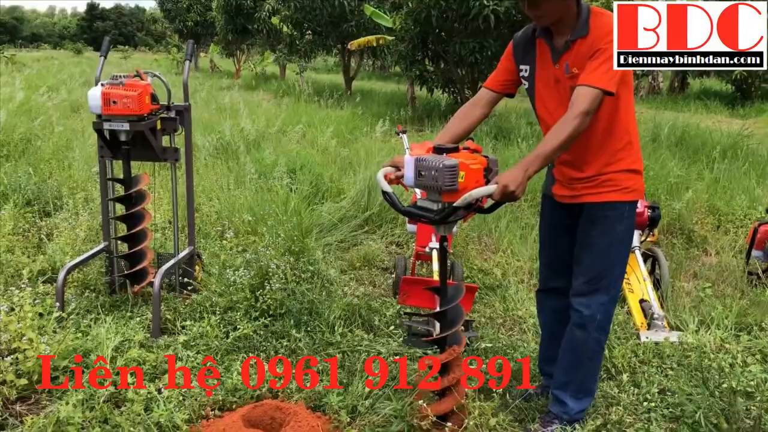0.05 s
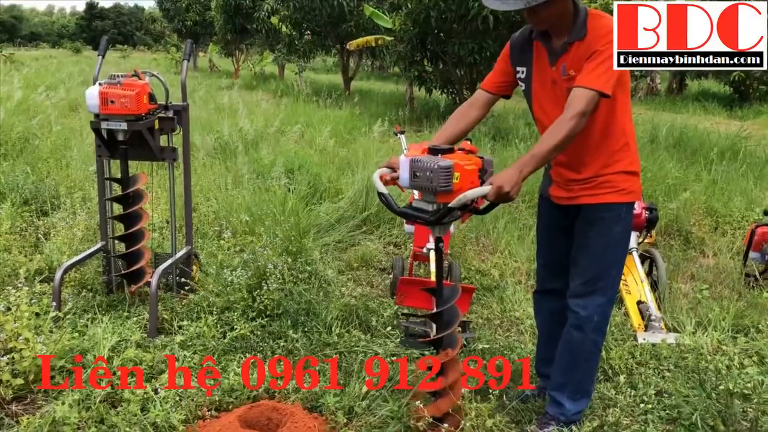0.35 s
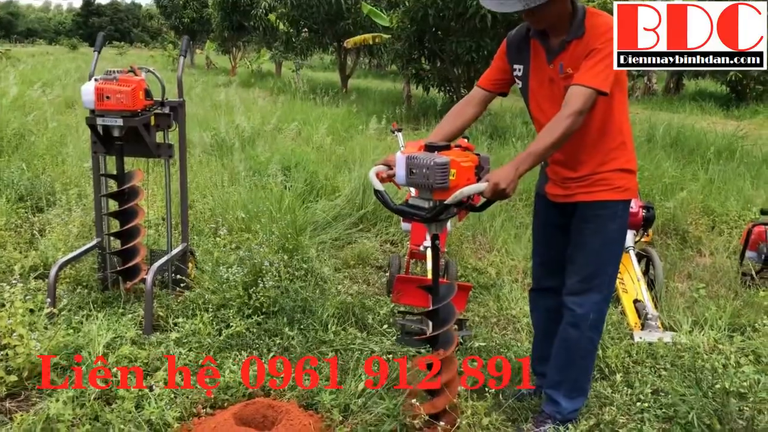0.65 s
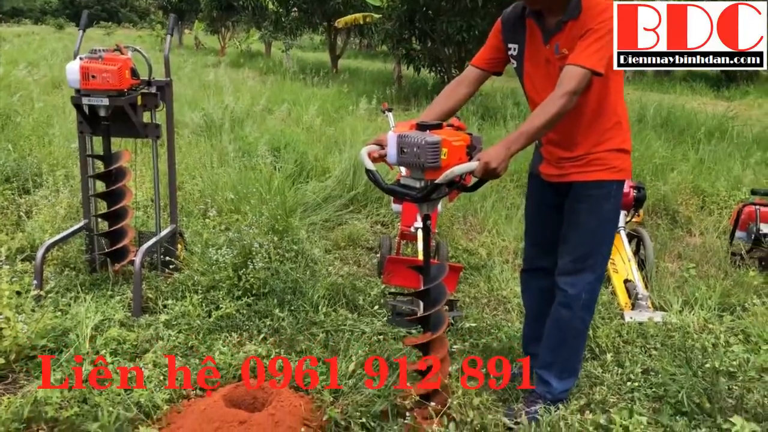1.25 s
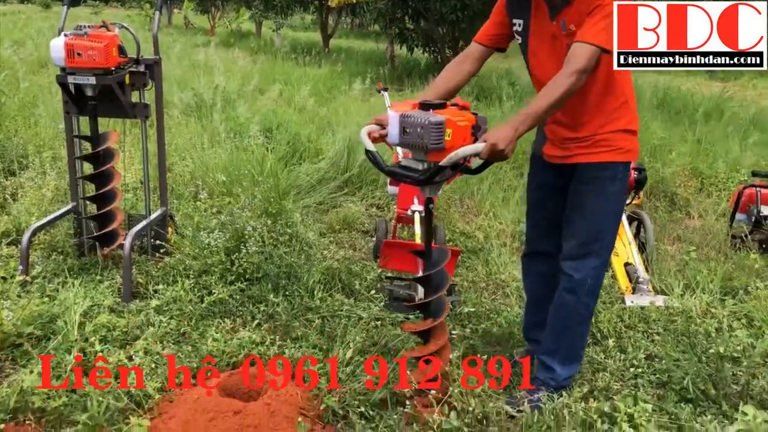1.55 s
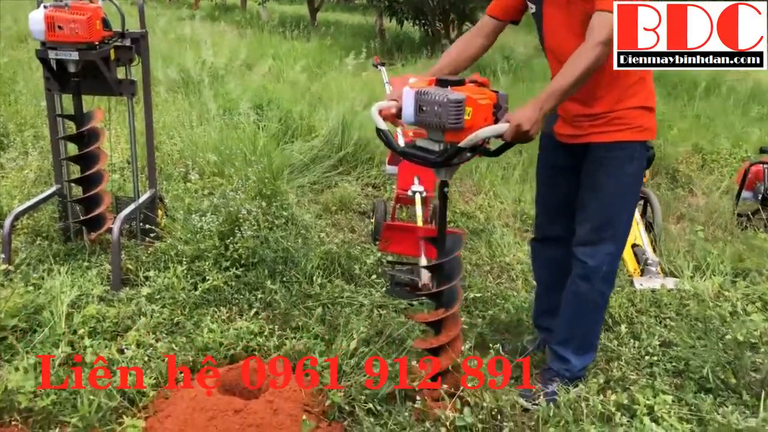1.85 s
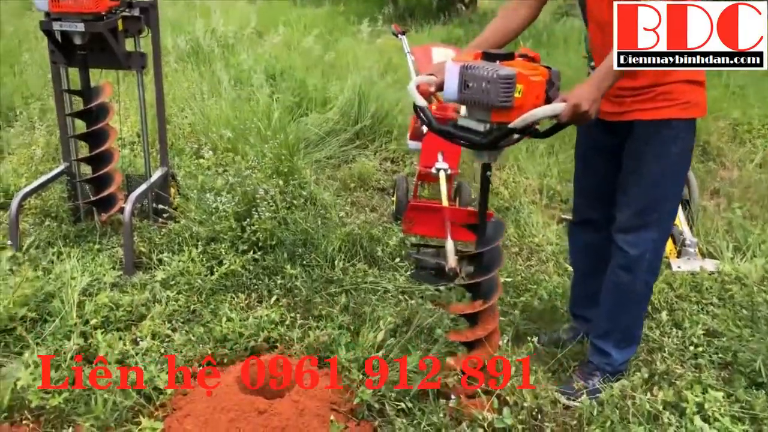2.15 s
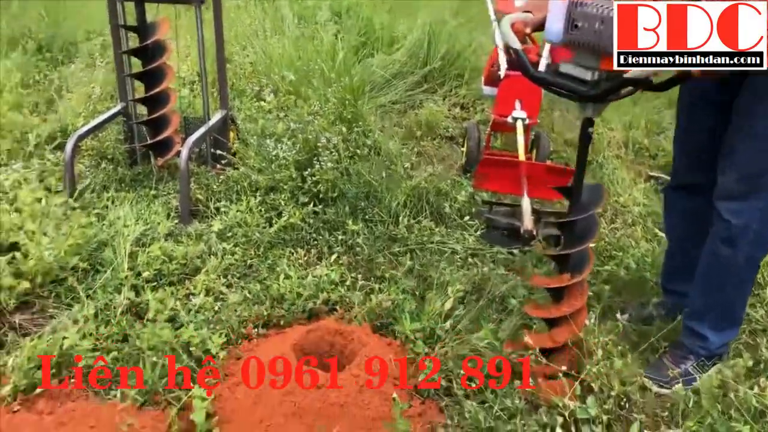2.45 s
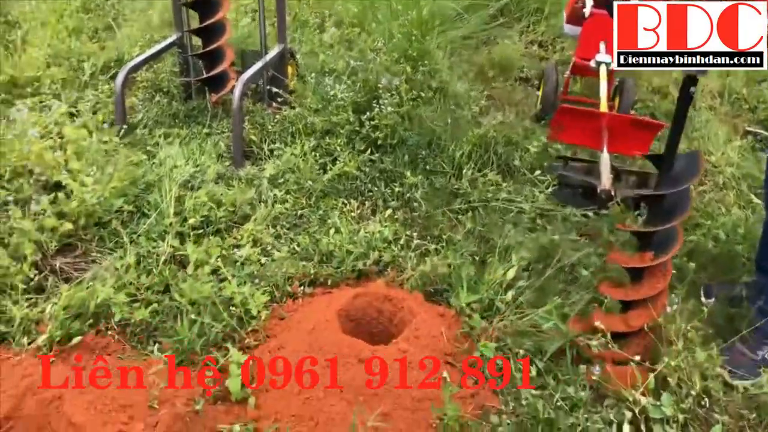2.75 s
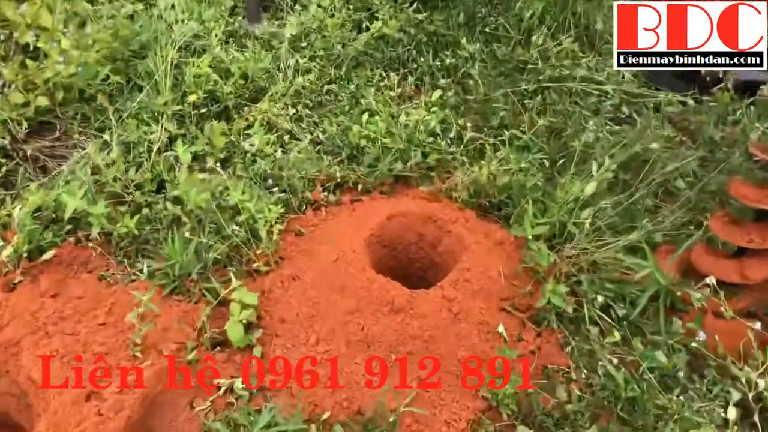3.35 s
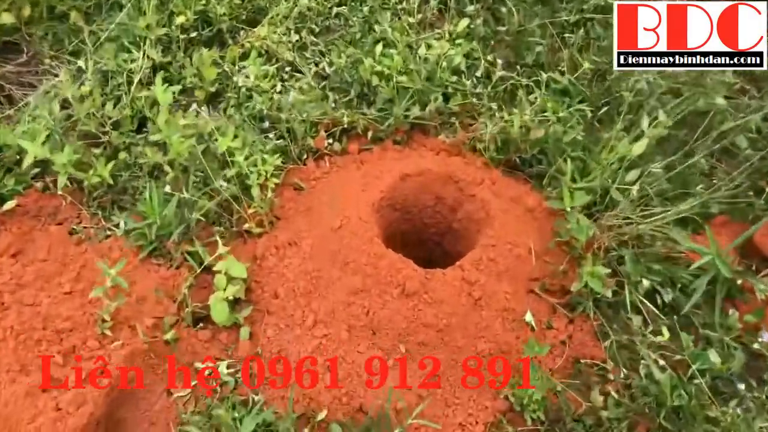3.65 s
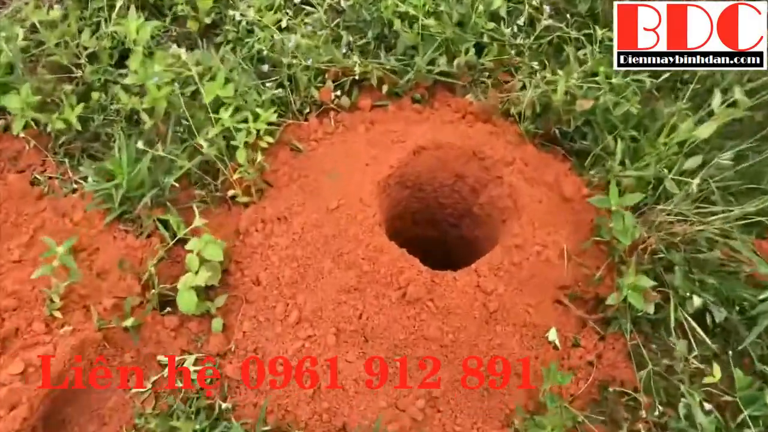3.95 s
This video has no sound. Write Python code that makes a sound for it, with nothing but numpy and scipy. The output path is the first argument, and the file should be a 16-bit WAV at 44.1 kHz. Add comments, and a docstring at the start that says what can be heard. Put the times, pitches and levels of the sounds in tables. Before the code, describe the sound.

A small two-stroke auger engine idles unevenly nearby, popping and clattering. It cuts out and winds down with a few metal clinks. Faint steps then rustle through grass, with soft knocks, in quiet open air.

```python
"""The small two-stroke engine of a handheld earth auger idles unevenly, popping on every third or
fourth turn. Each turn puffs through a ringing muffler and gulps air while piston and clutch clatter.
The ignition is cut: it coasts down, rocks back against compression and stops with a few metal clinks.
The tool is then carried off through the grass of a quiet orchard, with rustles and soft knocks."""
import sys
import numpy as np
from scipy import signal
from scipy.fft import rfft, irfft, next_fast_len
from scipy.io import wavfile

SR = 44100
rng = np.random.default_rng(int(sys.argv[2]) if len(sys.argv) > 2 else 0)


def file_out(sig):
    """Save sig as 16-bit WAV at sys.argv[1]."""
    # one column per channel
    cols = np.atleast_2d(sig).T
    # limit, then scale
    lim = np.clip(cols, -1, 1)
    pcm = np.round(lim * 32767).astype(np.int16)
    wavfile.write(sys.argv[1], SR, pcm)


N = 176400


def amp(db):
    return 10 ** (np.asarray(db) / 20)


def unit(x):
    return x / np.sqrt(np.mean(x ** 2) + 1e-20)


def clock():
    return np.arange(N) / SR


def bell(t, width):
    """A smooth swell around t = 0; width is its half length."""
    return np.exp(-.5 * (t / width) ** 2)


def filtered(x, response):
    """EQ x with a gain curve over frequency."""
    m = next_fast_len(N + SR // 2)
    return irfft(rfft(x, m) * response(np.fft.rfftfreq(m, 1 / SR)), m)[:N]


def noise(spectrum, grain=0, size=16):
    """Noise of rms 1 with a (Hz, dB) spectrum; grain roughens it in lumps of size samples."""
    f, db = np.transpose(spectrum)
    lumps = np.repeat(np.exp(grain * rng.standard_normal(N // size + 1)), size)[:N]
    rough = lumps * rng.standard_normal(N)
    return unit(filtered(rough, lambda hz: amp(np.interp(np.log(hz + 1), np.log(f), db))))


def swells(rows):
    """Envelope of (s, dB, half length s) swells."""
    return np.sqrt(sum((amp(db) * bell(clock() - s, width)) ** 2 for s, db, width in rows))


def burst(envelope, x):
    """x under a short envelope, carrying that envelope's energy."""
    return unit(envelope * x) * np.sqrt(np.mean(envelope ** 2))


def chirp(u, hz, width, sag_s):
    """A short swell of tone whose pitch falls through hz at u = 0."""
    return bell(u, width) * np.sin(2 * np.pi * hz * sag_s * (1 - np.exp(np.minimum(-u / sag_s, 10))))


IDLE_HZ, FIRST_TURN_S, CUT_S, ROCK_BACK_S = 47.7, .0093, .857, 1.2
# The idle and the coast to rest. Each row: time in seconds, turns per second.
CRANK_SPEED = [(0, 47.55), (.4, 48.3), (.6, 47.17), (.83, 48.05), (.92, 41.35), (1.03, 29.83), (1.1, 21.2),
               (1.16, 13.5), (1.24, 13.5), (1.29, 0)]
def crank():
    """The crankshaft's speed as a share of idle, and its turns since the first puff."""
    hz = np.interp(clock(), *np.transpose(CRANK_SPEED))
    return hz / IDLE_HZ, np.cumsum(hz) / SR - FIRST_TURN_S * IDLE_HZ


# The pops. Each row: time in seconds, relative crack level in dB, turns that misfire after it.
HARD_FIRINGS = [(.072, -30, 1), (.198, -29, 2), (.2605, -26, 2), (0.3225, -23.5, 2), (.385, -22.5, 2),
                (.447, -25, 1), (.531, -32.5, 1), (0.6153, -23.5, 2), (0.679, -31, 0), (0.7423, -26.5, 1),
                (0.845, -36.5, 0)]
# Puffs at idle for force 0 (unfired), 0.5 (soft) and 1 (hard). Each row: delay in seconds, pitch in Hz,
# half length in seconds, level in dB, gulp level in dB, gulp pitch in Hz.
PUFF_SHAPES = [(0.00225, 235, 0.0028, -21.5, -29, 170), (0.0015, 368, 0.0021, -18.5, -28.5, 320),
               (0.00044, 395, 0.00077, -14.5, -20, 136)]
def exhaust(soft_force=.54, misfire_force=.05, sag_s=.0045, gulp_s=.0082, scatter_db=.65):
    """Each turn puffs, falling in pitch as the cylinder empties, then gulps air at the intake."""
    speed, turns = crank()
    t, out = clock(), np.zeros(N)
    bangs, _, misses = np.transpose(HARD_FIRINGS)
    for s in np.interp(np.arange(int(turns[-1]) + 1), turns, t):
        chance, pace, since = rng.standard_normal(3), speed[int(s * SR)], s - bangs
        unfired = s > CUT_S or np.any((since > 0) & (since * IDLE_HZ < misses + .5))
        force = (misfire_force if unfired else soft_force) + .035 * chance[0]
        if np.abs(since).min() < .5 / IDLE_HZ:
            force = 1
        shape = [np.interp(force, [0, .5, 1], column) for column in np.transpose(PUFF_SHAPES)]
        delay, hz, width, db, gulp_db, gulp_hz = shape
        near = np.abs(t - s) < .1
        age = t[near] - s
        u = age * pace ** .29 - delay  # slower turns give longer puffs
        cycles = hz * sag_s * (1 - np.exp(-u / sag_s)) + hz * delay * np.clip(2 * force, 0, 1)
        puff = bell(u, width) * np.cos(2 * np.pi * cycles)
        gulp = chirp(age * pace ** .72 - gulp_s, gulp_hz, width=.0015, sag_s=sag_s)
        out[near] -= amp(db + scatter_db * chance[1]) * pace ** .66 * puff
        out[near] += amp(gulp_db + scatter_db * chance[2]) * pace ** .12 * gulp
    return out * amp(-4.5 * (t > ROCK_BACK_S))  # the backward swing puffs more weakly


# The muffler's hollow tone. Each row: pitch in Hz, level in dB, ring time (t60) in seconds.
MUFFLER_MODES = [(226.6, -5.5, 0.31), (734, 1, 0.058)]
def muffler(puffs):
    """The puffs set the muffler ringing."""
    def resonance(f, hz, db, t60):
        width_hz = np.log(1000) / (np.pi * t60)
        return amp(db) * 1j * f * width_hz / (hz * hz - f * f + 1j * f * width_hz)
    return filtered(puffs, lambda f: 1 + sum(resonance(f, *mode) for mode in MUFFLER_MODES))


# The metallic ring. Each row: pitch in Hz, relative level in dB, ring time (t60) in seconds.
FIN_MODES = [(1854, -4.5, 0.15), (2127, 0.5, 0.048), (2940, -1, 0.1), (3020, -1, 0.15), (3940, -11, 0.13),
             (4910, -10, 0.14), (5450, -2, 0.13)]
def fin_ring(drive):
    """The fins and casing ring under a shaking of the given strength."""
    t = np.arange(SR // 2) / SR
    modes = sum(amp(db - 60 * t / t60) / np.sqrt(t60) * np.sin(2 * np.pi * hz * t)
                for hz, db, t60 in FIN_MODES)
    return signal.fftconvolve(drive * rng.standard_normal(N), modes / np.linalg.norm(modes))[:N]


# Tone colours of the clatter and the rushing air. Each row: frequency in Hz, relative level in dB.
CLATTER_EQ = [(60, -1), (300, 2), (700, 1), (900, -10.5), (1150, -4.5), (1380, -8), (1800, -3), (2100, 2),
              (2550, -4.5), (3300, 0), (4500, -7.5), (6000, -8.5), (7500, -14.5), (15000, -18.5)]
HISS_EQ = [(1000, -43), (3000, 5.5), (6000, 5.5), (7700, -2.5), (13000, -8.5), (15500, -21)]
def machinery(clatter_db=-34, ring_db=-44, hiss_db=-38):
    """Piston and clutch clatter, with rushing air; both swell once a turn and die with the speed."""
    speed, turns = crank()
    slap = amp(4 * bell(turns % 1 - .49, .097))  # a 4 dB lift halfway through each turn
    drive = slap * speed ** 1.03
    clatter = amp(clatter_db) * drive * noise(CLATTER_EQ, grain=.43)
    ring = amp(ring_db) * fin_ring(drive)
    hiss = amp(hiss_db) * slap * speed ** 3.2 * noise(HISS_EQ, grain=.36)
    return clatter + ring + hiss


def casing(x, t60=.03, body_db=-8):
    """Sound passes partly straight, partly through the many short resonances of the casing."""
    t = np.arange(SR // 10) / SR
    body = rng.standard_normal(len(t)) * amp(-60 * t / t60)
    body *= amp(body_db) / np.linalg.norm(body)
    body[0] += 1  # the straight path
    return signal.fftconvolve(x, body / np.linalg.norm(body))[:N]


# The outdoor bed. Each row: frequency in Hz, relative level in dB.
AIR_EQ = [(30, -18), (52, 0), (115, -2.5), (300, -13), (1100, -15), (2200, -20), (6000, -23.5),
          (15000, -32.5)]
def orchard(level_db=-57):
    """Open air with a low distant rumble."""
    return amp(level_db) * noise(AIR_EQ, grain=.23)


# The bite on top of each pop. Each row: frequency in Hz, relative level in dB.
CRACK_EQ = [(800, -18), (1130, 9.5), (1400, -36), (2200, -4), (5600, -9.5), (6400, 2.5), (7700, -12.5),
            (8500, 0), (9500, -12), (12000, -13.5), (15000, -8)]
def cracks(lead_s=.0014, rise_s=.0017, fall_s=.0037, boost_db=4.5):
    """Hard firings spit a bright crack as the exhaust port opens."""
    drive = np.zeros(N)
    for s, db, _ in HARD_FIRINGS:
        u = clock() - s + lead_s
        drive += amp(db + boost_db) * np.where(u < 0, bell(u, rise_s), np.exp(-np.abs(u) / fall_s))
    return drive * noise(CRACK_EQ)


# Metal hits. Each row: time in seconds, level in dB, decay in seconds, treble limit in Hz.
CLINK_HITS = [(1.103, -27, 0.0057, 5000), (1.154, -29.5, 0.011, 7100), (1.171, -31, 0.0018, 2500),
              (1.223, -39, 0.0072, 2600), (1.252, -38, 0.0053, 6500), (1.304, -36.5, 0.012, 2200),
              (1.324, -35, 0.0073, 2520), (1.51, -43, 0.0059, 5000)]
# Their tone colour. Each row: frequency in Hz, relative level in dB.
CLINK_EQ = [(300, -4), (1200, -2), (1650, -6), (2130, 4.5), (2550, -8), (5800, 1), (9000, -8.5)]
def clinks(ring_db=-5, rise_s=.0014):
    """As the crank rocks to rest, loose parts rattle and the fins ring."""
    t, out = clock(), np.zeros(N)
    for s, db, fall_s, top_hz in CLINK_HITS:
        drive = amp(db) * np.where(t < s, bell(t - s, rise_s), np.exp(-np.abs(t - s) / fall_s))
        rattle = burst(drive, noise(CLINK_EQ))
        ring = amp(ring_db) * unit(fin_ring(drive)) * np.sqrt(np.mean(drive ** 2))
        out += filtered(rattle + ring, lambda hz: 1 / np.sqrt(1 + (hz / top_hz) ** 4))
    return out


# Low shakes. Each row: peak time in seconds, level in dB, pitch in Hz, half length in seconds.
FRAME_SHUDDERS = [(1.295, -47, 211, 0.028), (1.35, -41, 166.5, 0.011)]
def shudders(last_sag_s=.057):
    """The frame shudders ever lower; longer shudders sag more slowly."""
    last_width = FRAME_SHUDDERS[-1][-1]
    return sum(amp(db) * chirp(clock() - s, hz, width, last_sag_s * (width / last_width) ** 2)
               for s, db, hz, width in FRAME_SHUDDERS)


# Swishes. Each row: peak time in seconds, stalk level in dB, leaf level in dB, half length in seconds.
GRASS_SWISHES = [(1.91, -73, -70.5, 0.49), (2.44, -62.5, -59.5, 0.097), (2.609, -55.5, -64, 0.016),
                 (2.979, -55.5, -63, 0.016), (3.176, -48.5, -61, 0.023), (3.329, -58, -78, 0.027),
                 (3.675, -55, -52.5, 0.039), (3.77, -54.5, -53.5, 0.053), (3.884, -57, -58, 0.053)]
# Tone colours of stalks and leaves. Each row: frequency in Hz, relative level in dB.
STALK_EQ = [(100, -16), (400, -3.5), (750, -1), (1450, -2), (2500, -11), (15000, -29)]
LEAF_EQ = [(700, -3), (2500, -3), (9000, -8), (15000, -8.5)]
def grass():
    """Steps brush through the grass: crunchy stalks under a leafy hiss."""
    stalks = swells([(s, db, width) for s, db, _, width in GRASS_SWISHES])
    leaves = swells([(s, db, width) for s, _, db, width in GRASS_SWISHES])
    return stalks * noise(STALK_EQ, grain=.55, size=160) + leaves * noise(LEAF_EQ, grain=.3, size=48)


def tap(s, db, hz, width):
    """A brief contact: a broad burst of noise around one pitch."""
    band = [(hz / 10, -30), (hz / 1.6, 0), (hz * 1.35, 0), (hz * 2.4, -16), (hz * 10, -40)]
    return burst(swells([(s, db, width)]), noise(band))


# Dull bumps. Each row: time in seconds, level in dB, pitch in Hz, half length in seconds.
SOFT_KNOCKS = [(1.755, -50, 900, 0.0018), (2.477, -49, 1400, 0.0019), (2.551, -48, 704, 0.0013),
               (2.619, -52, 1000, 0.0015), (2.713, -44, 1150, 0.0015), (2.811, -51, 750, 0.0025),
               (3.421, -53, 1100, .002), (3.476, -51, 1350, 0.004), (3.665, -43.5, 290, 0.0026),
               (3.905, -41.5, 690, 0.0023), (3.927, -42.5, 590, 0.002)]
def knocks():
    """Steps and handling of the tool knock softly."""
    return sum(tap(*row) for row in SOFT_KNOCKS)


# Bright ticks. Each row: time in seconds, level in dB, pitch in Hz.
STALK_SNAPS = [(2.742, -49, 5560), (3.780, -50, 4800), (3.826, -48.5, 7000)]
def snaps():
    """A few stalks snap."""
    return sum(tap(*row, width=.001) for row in STALK_SNAPS)


def scene():
    """The engine, its stop and the walk away, over open air, in mono."""
    engine = muffler(exhaust()) + cracks() + casing(machinery())
    stop = clinks() + shudders()
    walk = grass() + knocks() + snaps()
    return (engine + stop + walk + orchard())[None]


def record(dry, low_hz=39, top_hz=15900):
    """The microphone drops the deep bass and the top."""
    return filtered(dry[0], lambda hz: (hz < top_hz) * (1 - 1 / (1 + (hz / low_hz) ** 10)))[None]


dry = scene()
out = record(dry)
file_out(out)
```